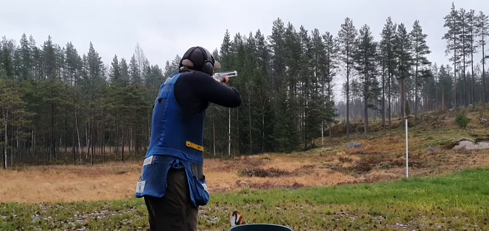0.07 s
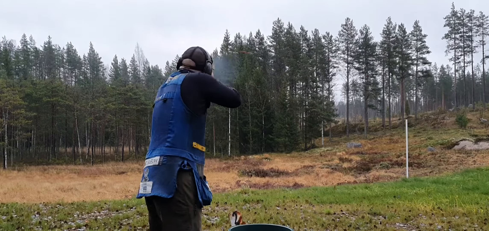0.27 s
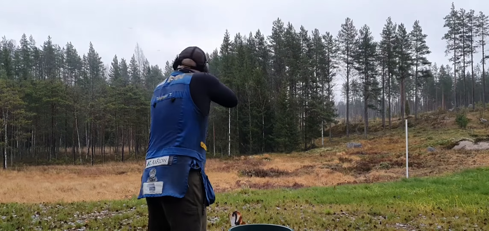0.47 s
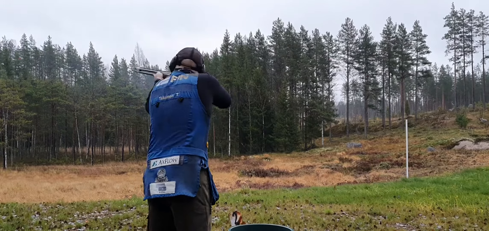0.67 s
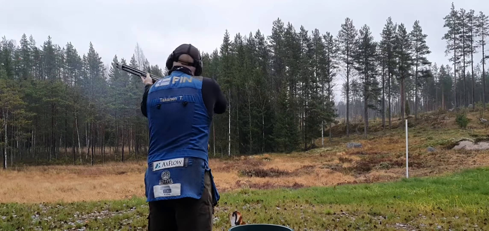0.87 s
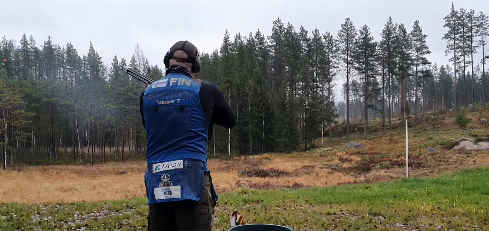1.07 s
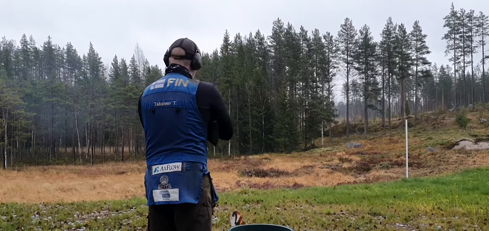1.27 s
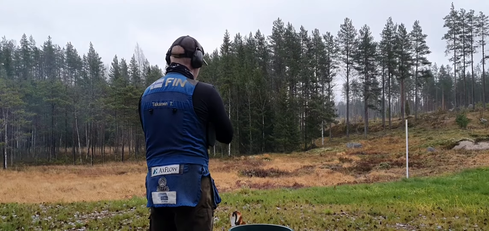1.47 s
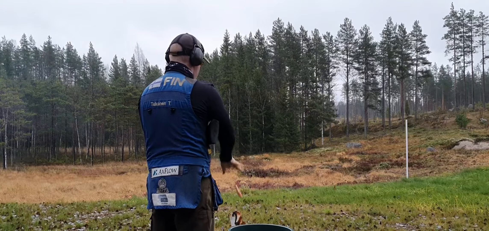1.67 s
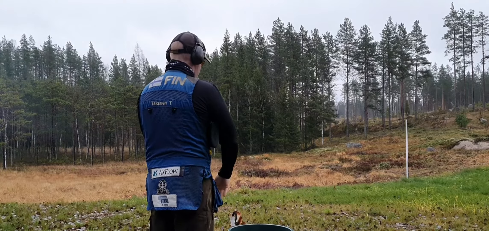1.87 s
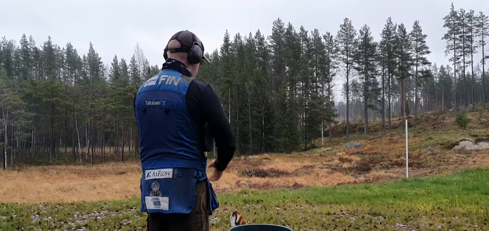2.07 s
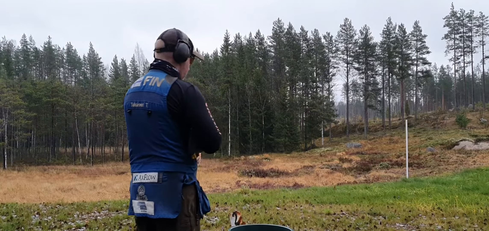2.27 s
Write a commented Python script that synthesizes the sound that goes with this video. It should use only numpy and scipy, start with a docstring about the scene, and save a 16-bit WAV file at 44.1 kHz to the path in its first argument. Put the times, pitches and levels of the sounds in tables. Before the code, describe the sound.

A shotgun fires once, echoes off the forest, then clicks open.

```python
"""A faint echo is dying in the forest when a shotgun fires on an open range, a few metres ahead.
The blast, a sudden jump in air pressure, scatters off the ground and rolls back from the trees.
The gun is broken open with steel clicks and a hiss. Two hollow knocks follow, likely the spent
shells landing. Sleeves rustle softly over a distant wash of sound and light wind."""
import sys
import numpy as np
from scipy import signal
from scipy.fft import rfft, irfft
from scipy.io import wavfile

SR = 44100
rng = np.random.default_rng(int(sys.argv[2]) if len(sys.argv) > 2 else 0)


def bounce(signal):
    """Save signal as a 16-bit WAV file at the path given by the first command-line argument."""
    frames = np.transpose(np.atleast_2d(signal))
    limited = np.clip(frames, -1, 1)
    pcm = np.round(limited * 32767).astype(np.int16)
    wavfile.write(sys.argv[1], SR, pcm)


N = 105840

# The muzzle blast and its softer ground bounce: t/s, level/dB, push length/s, rise/s, suction factor
BLAST_PULSES = [(.2083, 9.5, .00019, .00006, 1.4), (0.2111, -2.5, 0.00063, 0.0004, 1.1)]
# Tone of rubbing cloth, also used for the tick of a knock: f/Hz, level/dB
CLOTH_TONE = [(500, -16), (2000, 12), (4000, 0.5), (6500, -7), (9000, -10.5), (11500, -6.5), (15000, -33)]
# Stereo width of near and far sounds: f/Hz, side level against the middle/dB
NEAR_SPREAD = [(60, -20), (150, -24.5), (380, -6), (950, 7), (2400, -2), (6000, 0), (15000, 1)]
FAR_SPREAD = [(60, -1), (150, -18), (380, -12.5), (950, -1.5), (2400, 0), (6000, 0.5), (15000, -2)]


def amp(db):
    """Turn decibels into a gain to multiply by."""
    return 10 ** (np.asarray(db) / 20)


def look_up(points, hz):
    """Read between the rows of a table, on a log frequency scale."""
    f, value = np.transpose(points)
    return np.interp(np.log(hz + 1), np.log(f + 1), value)


def since(start):
    """Seconds since start, for every sample."""
    return np.arange(N) / SR - start


def fall(t, t60, rise=.0002):
    """A quick rise, then a fade of 60 dB every t60 seconds."""
    return np.clip(t / rise, 0, 1) * amp(-60 * np.maximum(t, 0) / t60)


def arch(start, length):
    """A soft rise and fall of level."""
    return np.sin(np.pi * np.clip(since(start) / length, 0, 1))


def pan(db):
    """Gains that make the left ear db louder than the right."""
    return amp(np.array([[db], [-db]]) / 2)


def colour(x, tone, size=4096):
    """Give x a tone. Only the shape of the table counts, not its overall level."""
    log_gain = np.log(amp(np.maximum(look_up(tone, abs(np.fft.fftfreq(size, 1 / SR))), -100)))
    # This filter rings only after a hit, never before it.
    taps = np.fft.ifft(np.exp(np.conj(signal.hilbert(log_gain)))).real[:size // 2]
    return signal.fftconvolve(x, taps[None] / np.linalg.norm(taps), axes=1)[:, :N]


def scatter(tone, width, grain_db=0):
    """Countless tiny arrivals blur into stereo noise; more grain makes it rougher."""
    noise = rng.standard_normal((2, N))
    noise *= amp(grain_db * np.minimum(rng.exponential(1, N), 5))
    mid, side = noise / noise.std()
    side = irfft(rfft(side) * amp(look_up(width, np.fft.rfftfreq(N, 1 / SR))), N)
    return colour(np.array([mid + side, mid - side]), tone)


def die_away(x, start, fade_times, size=512):
    """From start on, each pitch fades at its own speed."""
    hz, t, bands = signal.stft(x, SR, nperseg=size)
    fade = amp(-60 * np.maximum(t - start, 0) / look_up(fade_times, hz)[:, None])
    return signal.istft(bands * fade, SR, nperseg=size)[1][:, :N]


def impulses(rows, smear, smear_t60):
    """One spike per row, trailed by a short spray that differs between the ears."""
    out = np.zeros((2, N))
    for start, db, lean_db in rows:
        spray = rng.standard_normal((2, N)) * fall(since(start), smear_t60)
        spike = signal.unit_impulse(N, round(start * SR))
        hit = spike + smear * spray / np.linalg.norm(spray[0])
        out += amp(db) * pan(lean_db) * hit / np.hypot(1, smear)
    return out


def foliage(x, treble_db, split_hz=433):
    """Leaves shape an echo's treble: below 0 dB is duller, above is brighter."""
    low = signal.sosfilt(signal.butter(1, split_hz, fs=SR, output="sos"), x)
    return low + amp(treble_db) * (x - low)


def distant_wash():
    """A faint, low background wash, turned down by the recorder's gain after the shot, then back up."""
    tone = [(15, -40.5), (30, -8.5), (110, -17), (170, -13), (300, 0.5), (450, -0.5), (700, -1.5),
            (1000, -8.5), (1600, -15), (2300, -19.5), (3300, -24.5), (4400, -42), (8500, -49.5),
            (16000, -57.5)]  # f/Hz, level/dB
    recorder_gain = [(0, 12), (.5, 6.5), (1.33, -5), (1.45, 2.5), (1.651, 3), (2.4, 1)]  # t/s, gain/dB
    gain_db = np.interp(since(0), *np.transpose(recorder_gain))
    return amp(-53 + gain_db) * scatter(tone, FAR_SPREAD)


def wind():
    """Light puffs of wind rumble on the microphone."""
    puffs = [(1.708, 0.21, -63.5), (2.186, 0.26, -56)]  # t/s, length/s, level/dB
    tone = [(20, -18), (45, 4), (90, -4.5), (200, -3.5), (600, -67)]  # f/Hz, level/dB
    return sum(amp(db) * arch(start, length) for start, length, db in puffs) * scatter(tone, FAR_SPREAD)


def clothes():
    """Each arm movement rubs sleeve and vest: a wide rustle with a narrower swish."""
    # Movements: t/s, length/s, level/dB, swish f/Hz, swish against rustle/dB
    moves = [(.96, 0.13, -69, 8000, -12), (1.367, 0.27, -62, 11000, -23), (1.507, 0.26, -62, 2900, -8),
             (1.733, .2, -61.5, 6730, -17), (1.876, .16, -71, 6000, -27), (2.046, 0.12, -83, 8730, 4),
             (2.3, .13, -64, 4000, -23)]
    out = np.zeros((2, N))
    for start, length, db, hz, swish_db in moves:
        swish = scatter([(hz / 2, -35), (hz, 0), (hz * 2, -45)], NEAR_SPREAD)
        rustle = scatter(CLOTH_TONE, NEAR_SPREAD, grain_db=4)
        out += amp(db) * arch(start, length) ** .69 * (rustle + amp(swish_db) * swish)
    return out


def far_trees():
    """The farthest trees send back only a low swell."""
    swell = (0.83, 0.16, -33.5)  # t/s, length/s, level/dB
    tone = [(100, -33), (200, -5), (310, 0), (520, -3.5), (900, -11), (3000, -69.5)]  # f/Hz, level/dB
    start, length, db = swell
    level = amp(db) * arch(start, length) * fall(since(start), t60=1.24)
    return level * scatter(tone, FAR_SPREAD, grain_db=4.5)


def slope_booms(hz=80.1, length_s=.018):
    """The slope throws back short pulses of bass."""
    booms = [(0.407, -34), (0.702, -46)]  # t/s, level/dB
    return sum(amp(db) * arch(start, length_s) * np.sin(2 * np.pi * hz * since(start))
               for start, db in booms)


def forest():
    """The first trunks return single claps; the trees behind them a rolling echo."""
    trunk_echoes = [(0.4978, -1.5, -6.5), (0.5014, -3.5, -27), (0.504, 1, -30), (0.5243, -17, -3),
                    (.5298, -11, 6.5), (0.5465, -17.5, 15), (0.5843, -2, 2.5), (0.5928, -9, 5),
                    (0.6107, -2, -5.5)]  # t/s, level/dB, treble change/dB
    rolls = [(0, -34.5, 0.00069, 0.038, 0), (0.517, -30.5, 0.015, 0.069, 2.5),
             (0.806, -36, 0.014, 0.02, -8.5)]  # t/s, level/dB, rise/s, hold/s, treble change/dB
    tone = [(24, -48), (45, -10), (70, -19), (130, -25), (210, -9), (320, 1), (500, 0), (730, 0.5),
            (1100, -9.5), (1700, -10.5), (2200, -17), (3400, -16.5), (5000, -31), (7700, -41),
            (11300, -46.5), (14000, -61.5), (16000, -87)]  # f/Hz, level/dB
    fade_times = [(80, 2.3), (300, 1.6), (800, 1.395), (2500, 1.43), (5000, 1.6), (12000, 0.31)]  # f/Hz, t60/s
    claps = sum(foliage(impulses([(start, db, 0)], smear=.41, smear_t60=.031), treble_db)
                for start, db, treble_db in trunk_echoes)
    out = colour(claps, tone)
    for start, db, rise, hold, treble_db in rolls:
        roll = die_away(scatter(tone, FAR_SPREAD, grain_db=5), start + rise + hold, fade_times)
        out += amp(db) * np.clip(since(start) / rise, 0, 1) * foliage(roll, treble_db)
    return out


def knocks(rise_s=.0013):
    """The gun's stock and the hollow shells knock: two brief rings, a clatter and a tick."""
    # Knocks: t/s, ring level/dB, ring f/Hz, low ring f/Hz, low ring level/dB, clatter/dB, tick/dB
    hits = [(1.49, -56, 374, 121, -38, -71, -67), (1.7990, -28.5, 640, 189, -36, -36.5, -72),
            (1.8690, -26.5, 870, 470, -33.5, -46, -47)]
    shell_tone = [(100, -25), (600, 11.5), (1000, -5), (1600, -6), (3400, -3.5), (5200, -22.5), (8000, -35),
                  (11000, -32), (16000, -48)]  # f/Hz, level/dB
    clatter = scatter(shell_tone, FAR_SPREAD, grain_db=2)
    tick = scatter(CLOTH_TONE, NEAR_SPREAD)
    out = np.zeros((2, N))
    for start, db, hz, low_hz, low_db, clatter_db, tick_db in hits:
        t = since(start)
        low_t60 = .073 * 140 / low_hz  # deeper rings last longer
        out += amp(db) * fall(t, .016, rise_s) * np.sin(2 * np.pi * hz * t)
        out += amp(low_db) * fall(t, low_t60, rise_s) * np.sin(2 * np.pi * low_hz * t)
        out += amp(clatter_db) * fall(t, .082, rise_s) * clatter
        out += amp(tick_db) * fall(t, .011) * tick
    return out


def gun_opening(hiss_hold_s=.047, hiss_t60_s=.17):
    """The latch and shell ejectors click and ring; sliding steel and escaping gas hiss."""
    clicks = [(1.4885, -24.5, 9), (1.4905, -17.5, -4), (1.4937, -13.5, -1), (1.4960, -20, -9),
              (1.4982, -29, 3), (1.5208, -21, -2)]  # t/s, level/dB, left minus right/dB
    steel_tone = [(180, -39), (300, -14), (398, -25), (1150, 1.5), (2210, -6.5), (2650, 0.5), (3760, 3),
                  (4830, -12), (6850, -11), (7440, -26), (8360, -6), (12900, -6.5), (16000, -50)]  # f/Hz, level/dB
    steel_rings = [(3030, -35, 0.038), (3830, -37, 0.048), (5350, -29, .06), (6100, -29, 0.081),
                   (8250, -34, 0.044), (10900, -28, .035)]  # f/Hz, level/dB, t60/s
    hiss_tone = [(1180, -53), (2000, -28), (2880, 0), (3170, 0), (4260, -4.5), (5540, -3.5), (6470, -5.5),
                 (8190, -6), (9660, -9), (11200, -1), (16000, -17.5)]  # f/Hz, level/dB
    hits = impulses(clicks, smear=1.8, smear_t60=.011)
    t = since(0)
    ring = sum(amp(db) * fall(t, t60) * np.sin(2 * np.pi * hz * t) for hz, db, t60 in steel_rings)
    ringing = amp(-2.5) * signal.fftconvolve(hits, ring[None], axes=1)[:, :N]
    t = since(clicks[0][0])
    hiss_db = -46.5 - 60 * np.maximum(t - hiss_hold_s, 0) / hiss_t60_s
    hiss = np.clip(t / .004, 0, 1) * amp(hiss_db) * scatter(hiss_tone, NEAR_SPREAD, grain_db=2.5)
    return colour(hits, steel_tone) + ringing + hiss


def ground(peak_s=.2465, rise_db_per_s=285, fall_db_per_s=292.5):
    """The blast scatters: a roar off near ground, slaps off nearby things, a tail off the field."""
    roar_tone = [(18, -41), (35, -9), (85, 6), (135, -9.5), (260, -5.5), (460, -5), (780, -20.5),
                 (1400, -17.5), (2000, -13), (2800, -13), (5300, -17.5), (6700, -17), (8000, -24.5),
                 (11100, -17.5), (16000, -34.5)]  # f/Hz, level/dB
    roar_fade = [(80, .22), (200, .9), (500, 4.6), (8000, 3.6)]  # extra fading, bass first: f/Hz, t60/s
    field_tone = [(18, -50.5), (35, -27), (85, 2.5), (140, -8), (190, -1), (300, -12), (700, -23.5),
                  (1200, -19.5), (2000, -19.5), (2900, -16), (6200, -23.5), (8100, -32.5), (11100, -23.5),
                  (16000, -37.5)]  # f/Hz, level/dB
    field_fade = [(60, 1.3), (250, 1.1), (1500, 2.62), (4000, 1.36), (8000, 1.4), (14000, 0.52)]  # f/Hz, t60/s
    reflections = [(.2270, 8, -6.5), (.2396, -3, 1), (.2447, 4, 7.5), (.2454, 7, -4), (.3178, -5.5, 4),
                   (.3835, -29, -5), (.4085, -6, -13.5)]  # t/s, level/dB, left minus right/dB
    slap_tone = [(40, -25.5), (120, -8.5), (400, -3), (800, 0), (1200, 0.5), (1800, -11.5), (2800, 2),
                 (4300, -3.5), (5300, -15.5), (6900, -8.5), (8000, -16), (11200, -11), (16000, -27)]  # f/Hz, level/dB
    air_loss = [(1500, 9), (4000, 2.5), (12000, .6)]  # later slaps lose their treble: f/Hz, t60/s
    t = since(peak_s)
    fired = np.clip(since(BLAST_PULSES[0][0]) / .003, 0, 1)
    swell = fired * amp(-16 + np.minimum(rise_db_per_s * t, -fall_db_per_s * t))
    roar = swell * die_away(scatter(roar_tone, NEAR_SPREAD, grain_db=1), peak_s, roar_fade)
    field = die_away(scatter(field_tone, NEAR_SPREAD, grain_db=3), peak_s, field_fade)
    tail = amp(-28.5) * np.clip(t / .045, 0, 1) * field
    slaps = colour(impulses(reflections, smear=3, smear_t60=.02), slap_tone)
    return roar + die_away(slaps, peak_s, air_loss) + tail


def blast(crack_lead_s=.0003):
    """The muzzle blast pushes the air out, then sucks it back, with a short crack on top."""
    crack_tone = [(25, -35), (60, -7), (400, -11.5), (800, -8), (1300, 0), (1800, -2.5), (2800, 8),
                  (3800, -8), (5000, -16.5), (6900, -13), (8000, -19), (10900, -7.5), (14000, -24),
                  (16000, -26)]  # f/Hz, level/dB
    noise = scatter(crack_tone, NEAR_SPREAD)
    out = np.zeros((2, N))
    for start, db, length, rise, suction in BLAST_PULSES:
        t = since(start)
        age = np.maximum(t, 0) / length  # push turns to suction at 1
        pressure = np.clip(t / rise, 0, 1) * (1 - age) * np.exp(-age) * np.where(age > 1, suction, 1)
        crack = amp(-11) * noise * fall(t + crack_lead_s, t60=.0075, rise=.0007)
        out += amp(db) * (pressure + crack)
    return out


def scene():
    """The shot, its echoes, the handling of the gun and the background."""
    shot = blast() + ground() + slope_booms() + forest()
    handling = gun_opening() + knocks() + clothes()
    return shot + handling + distant_wash() + wind() + far_trees()


def record(dry, low_cut_hz=35, ceiling=.86, high_cut_hz=16100):
    """The treble leans right, loud peaks are rounded off, and the lowest and highest pitches are cut."""
    lean = [(60, 0.5), (400, -0.5), (950, 1.5), (2400, -2), (6000, -1.5), (10000, -3.5), (15000, -8)]  # f/Hz, left minus right/dB
    lean_db = look_up(lean, np.fft.rfftfreq(N, 1 / SR))
    x = irfft(rfft(dry) * amp(np.array([lean_db, -lean_db]) / 2), N)
    x = signal.sosfilt(signal.butter(2, low_cut_hz, "high", fs=SR, output="sos"), x)
    x = x / (1 + (x / ceiling) ** 4) ** .25  # soft overload
    high_cut = signal.firwin(511, high_cut_hz, window=("kaiser", 9), fs=SR)
    return signal.oaconvolve(x, high_cut[None], "same")


dry = scene()
out = record(dry)
bounce(out)
```